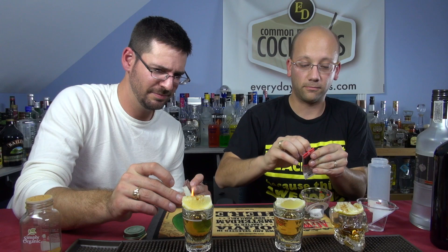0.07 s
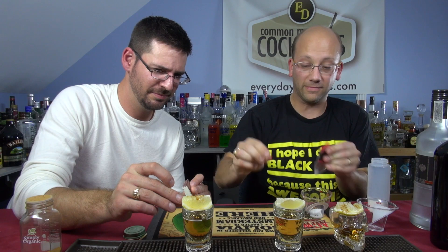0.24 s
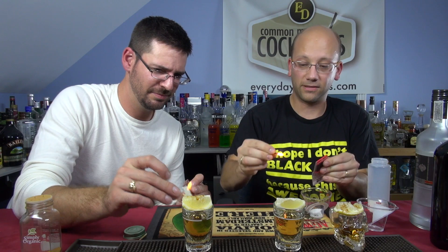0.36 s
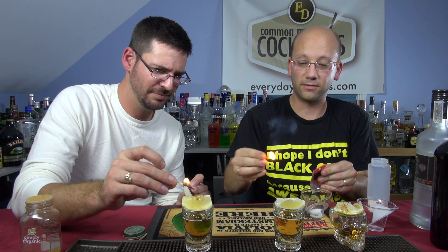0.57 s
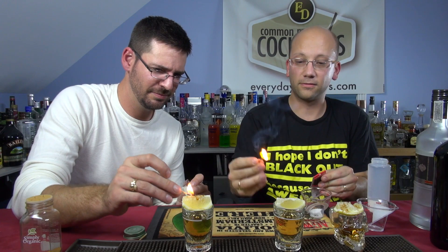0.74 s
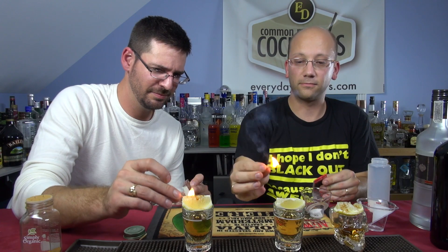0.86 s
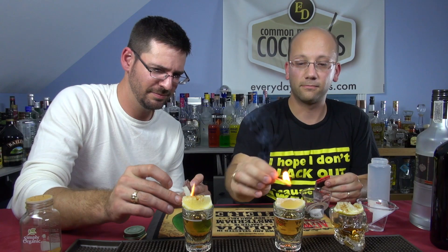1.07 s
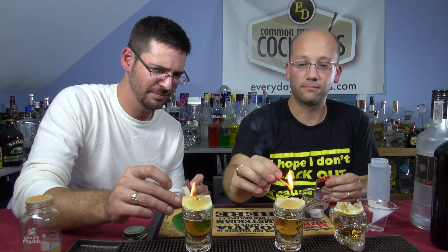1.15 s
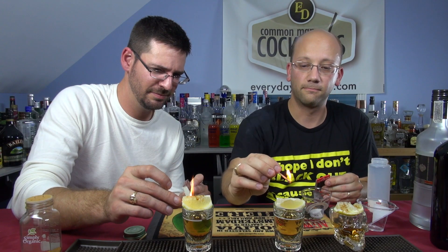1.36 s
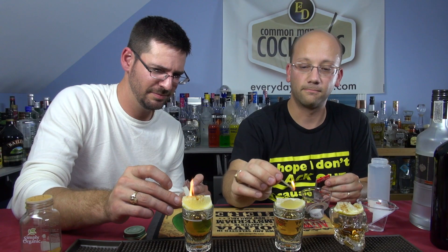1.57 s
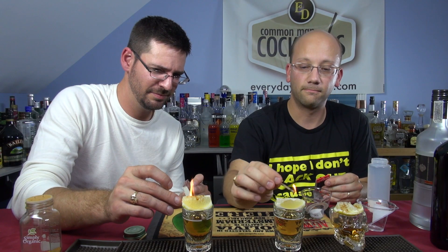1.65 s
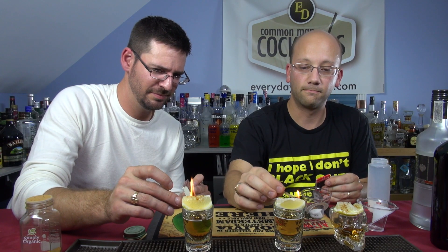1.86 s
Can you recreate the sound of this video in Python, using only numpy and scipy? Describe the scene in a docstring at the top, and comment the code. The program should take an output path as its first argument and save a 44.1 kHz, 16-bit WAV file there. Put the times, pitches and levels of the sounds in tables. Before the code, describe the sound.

Wooden match rasps across a striking strip, fizzes and snaps loudly, a dull bump on the counter follows, then quiet breathy flaring for about a second and sparse tiny ticks; near microphone, short indoor reverberation.

```python
"""A match is struck at a bar counter in a small, quiet room.
The head grates along the box as grit on the strip rings it, and coarse grains add short rasps.
It catches with a rising fizz and a sharp double crack, then flares: a hiss and low rush of noise,
echoed by the counter top, with a soft puff near the end.
A dull bump sets counter modes ringing, and dry ticks go on over air noise and a low hum."""
import sys
import numpy as np
from scipy import signal
from scipy.fft import rfft, irfft, next_fast_len
from scipy.io import wavfile

SR = 44100
rng = np.random.default_rng(int(sys.argv[2]) if len(sys.argv) > 2 else 0)


def unload_audio(sound):
    """Save the sound as a 16-bit wav file, at the path given as the first command line argument."""
    columns = np.transpose(np.atleast_2d(sound))
    # keep every value between -1 and 1, then stretch to whole-number steps
    steps = np.round(np.clip(columns, -1, 1) * 32767)
    wavfile.write(sys.argv[1], SR, steps.astype(np.int16))


N = 83790
TIME = np.arange(N) / SR
CRACK_S = .2559  # the head cracks and the scrape ends

# Spectrum of ticks, crackle and snags: (frequency [Hz], level [dB])
TICK_COLOUR = [(300, -18.5), (1100, -13.5), (1600, -3.5), (2700, -5.5), (3100, 2), (3700, -5),
               (4500, -10.5), (6000, -2.5), (7900, -0.5), (8800, -5.5), (15500, -8), (18000, -17)]


def from_db(db):
    """Decibels to gain."""
    return 10 ** (np.asarray(db) / 20)


def rms_one(x):
    """Scale to unit power."""
    return x / np.sqrt(np.mean(x ** 2) + 1e-20)


def in_time(rows):
    """Each column of a curve, interpolated at every sample."""
    s, *columns = np.transpose(rows)
    return [np.interp(TIME, s, c) for c in columns]


def colour(x, points, tilt_db=0, keep_power=True):
    """Causal minimum-phase filter with the given spectrum, tilted in dB per octave."""
    size = 2 * next_fast_len(len(x))
    octave = np.log2(np.maximum(np.fft.rfftfreq(size, 1 / SR), 1))
    hz, db = np.transpose(points)
    gain = from_db(np.interp(octave, np.log2(hz), db) + tilt_db * octave)
    if keep_power:
        gain = rms_one(gain)
    # Folding the cepstrum forward in time makes the filter causal
    cepstrum = irfft(np.log(gain))
    cepstrum[1:size // 2] *= 2
    cepstrum[size // 2 + 1:] = 0
    response = np.exp(rfft(cepstrum))
    return irfft(rfft(x, size) * response)[:len(x)]


def noise(points):
    """Coloured noise of unit power."""
    return rms_one(colour(rng.standard_normal(N), points))


def drift(rate):
    """Smooth random wavering of spread 1: noise low-passed at rate [Hz]."""
    lowpass = signal.butter(2, rate, fs=SR, output="sos")
    settled = signal.sosfilt(lowpass, rng.standard_normal(2 * N))[N:]
    return rms_one(settled)


def grains(per_s, spread_db):
    """Random clicks of uneven size and either sign, unit power."""
    sizes = from_db(spread_db * np.minimum(rng.exponential(1, N), 4))
    signed = sizes * rng.choice([-1, 1], N)
    return rms_one(signed * (rng.random(N) < per_s / SR))


def burst(decay_s, size=2048):
    """A brief spit of noise that swells and dies, with an even spectrum and unit energy."""
    fade = TIME[:size] / decay_s * np.exp(-TIME[:size] / decay_s)
    x = rng.standard_normal(size) * fade
    # Flatten the spectrum and restore the fade in turn
    for _ in range(6):
        phase = np.angle(rfft(x, 2 * size))
        flat = irfft(np.exp(1j * phase))[:size]
        x = flat * (fade / fade.max()) ** .25
    return x / np.linalg.norm(x)


def at(s, x):
    """Place a short sound at its moment."""
    return np.pad(x, (max(int(s * SR), 0), N))[:N]


def resonate(x, hz, width_hz):
    """Two-pole resonance with gain 1 on top."""
    r = np.exp(-np.pi * width_hz / SR)
    feed = np.array([1, 0, -1]) * (1 - r * r) / 2
    return signal.lfilter(feed, [1, -2 * r * np.cos(2 * np.pi * hz / SR), r * r], x)


def patchy(x, depth_db, count=20):
    """Overlapping parts of the spectrum each waver in level by themselves; unit power."""
    patches_per_s = 9
    place = np.sqrt(2 * np.fft.rfftfreq(N)) * count
    spectrum = rfft(x)
    bands = (irfft(spectrum * np.maximum(0, 1 - abs(place - k)), N) for k in range(count + 1))
    return rms_one(sum(band * from_db(depth_db * drift(patches_per_s)) for band in bands))


def background():
    """Air noise of the room under a low hum that wavers in phase and level."""
    # Spectrum of the air noise: (frequency [Hz], level [dB])
    air_colour = [(25, -6), (58, 0), (160, -5), (320, -15.5), (560, -19.5), (780, -15.5), (1100, -22),
                  (2200, -26.5), (3200, -22.5), (4500, -27.5), (7700, -20.5), (8700, -29), (10100, -20),
                  (11600, -32.5), (15500, -24.5)]
    air_db, hum_db, hum_hz = -53, -57, 58.2
    phase = 2 * np.pi * hum_hz * TIME + 0.6 * drift(5.7)
    hum = np.sqrt(2) * np.sin(phase) * (1 + 0.29 * drift(1.9))
    return from_db(air_db) * noise(air_colour) + from_db(hum_db) * hum


def room(x):
    """One near wall echo and a short diffuse tail of decaying noise."""
    # Colour of the reverberation: (frequency [Hz], level relative to the sound sent in [dB])
    room_colour = [(100, -4.5), (400, -4), (900, -6), (1600, -3), (4000, -11), (7000, -10.5), (10000, -28),
                   (15500, -24)]
    t60_s, gap_s = 0.2, 0.0046
    wall_echo_s, wall_echo_gain = .0082, 0.28
    tail = rng.standard_normal(N) * from_db(-60 * TIME / t60_s) * (TIME > gap_s)
    response = tail / np.linalg.norm(tail) + at(wall_echo_s, np.array([wall_echo_gain]))
    return signal.fftconvolve(x, colour(response, room_colour, keep_power=False))[:N]


def overload_shift():
    """The recorder's level is pushed to one side by the loud crack and drifts back."""
    shift_db, attack_s, decay_s = -29, .002, 0.045
    onset = 1 - np.exp(-TIME / attack_s)
    return at(CRACK_S, -from_db(shift_db) * onset * np.exp(-TIME / decay_s))


def bump():
    """A soft contact sets the counter's low modes ringing."""
    # Modes of the counter: (frequency [Hz], relative level [dB], t60 [s])
    counter_modes = [(172, -15, 0.076), (268, 5, 0.02), (435, -8, 0.063)]
    bump_s, contact_s, bump_db = .3936, 0.0018, -25
    push = np.sin(np.pi * np.minimum(TIME / contact_s, 1)) ** 2
    ring = sum(from_db(db - 60 * TIME / t60) * np.cos(2 * np.pi * hz * TIME)
               for hz, db, t60 in counter_modes)
    softened = signal.fftconvolve(ring, push / push.sum())[:N]
    return at(bump_s, from_db(bump_db) * softened)


def tick(tilt_db, decay_s, ring_hz):
    """A ragged little fracture with a resonance of its own; unit energy."""
    ring_width_hz, ring_db, grain_db = 640, 2.5, 3.5
    x = burst(decay_s)
    ragged = x * from_db(grain_db * rng.standard_normal(len(x)))
    x = colour(ragged, TICK_COLOUR, tilt_db)
    x = x + from_db(ring_db) * resonate(x, ring_hz, ring_width_hz)
    return x / np.linalg.norm(x)


def ticks():
    """Burning wood gives single dry ticks over a faint random crackle."""
    # Ticks of burning wood:
    # (time [s], energy [dB], treble tilt [dB per octave], decay [s], resonance [Hz])
    wood_ticks = [(.399, -16, -2, .0005, 7600), (.405, -18, -1, 0.00024, 6800),
                  (0.4605, -17, 3, 0.00031, 9600), (0.5266, -16, 1, 0.00068, 5440),
                  (.843, -21, 2, 0.00043, 9700), (1.1801, -23, -1.5, .0007, 9500),
                  (1.3393, -18.5, 0, .0001, 7800), (1.341, -16.5, 1, 0.00042, 3030),
                  (1.3672, -24, -1, 0.00058, 9000), (1.3805, -27, 5, 0.00016, 9500),
                  (1.4369, -20, -1, 0.000082, 2930), (1.5837, -20.5, .5, 0.00017, 9100),
                  (1.642, -24.5, -4, 0.00047, 5000), (1.8224, -26.5, 0, .0008, 7100),
                  (1.8405, -27, 1.5, .0009, 9600)]
    crackles_per_s, spread_db, crackle_db = 320, 1.5, -61
    clear = sum(at(s, from_db(db) * tick(tilt, decay, hz)) for s, db, tilt, decay, hz in wood_ticks)
    crackle = colour(grains(crackles_per_s, spread_db), TICK_COLOUR)
    return clear + from_db(crackle_db) * crackle


def snags():
    """The head snags on coarse grains that break off the strip, each with a short rasp."""
    # Snags on coarse grit: (time [s], energy [dB])
    snag_moments = [(0.0184, -13.5), (0.1384, -16.5), (0.1698, -16), (.1786, -15), (0.1956, -21),
                    (0.2032, -18.5), (.215, -19)]
    decay_s, tilt_db = .00055, -1.5  # tilt per octave
    rasps = sum(at(s, from_db(db) * burst(decay_s)) for s, db in snag_moments)
    return colour(rasps, TICK_COLOUR, tilt_db)


def squeak():
    """The head squeaks briefly as it speeds off the end of the strip: noise through resonances."""
    # Squeak resonances: (frequency [Hz], width [Hz])
    squeak_modes = [(5100, 350), (7100, 510)]
    squeak_s, spread_s, squeak_db = 0.235, 0.003, -31
    rub = rng.standard_normal(N)
    tone = rms_one(sum(rms_one(resonate(rub, hz, width)) for hz, width in squeak_modes))
    return from_db(squeak_db) * tone * np.exp(-((TIME - squeak_s) / spread_s) ** 2 / 2)


def scrape():
    """Grit catches on the head and rings the box; a thin whisk of friction sinks along the stroke."""
    # Pressure of the head on the striking strip: (time [s], level [dB])
    stroke = [(0, -43.5), (.011, -38.5), (.022, -37), (.092, -37.5), (.135, -35.5), (.19, -41), (.232, -41),
              (.25, -40)]
    # Spectrum of the scrape: (frequency [Hz], level [dB])
    strip_colour = [(300, -12.5), (1300, -10), (1900, -2), (2400, -4), (4300, -2.5), (6300, -1), (8800, 1),
                    (10200, -13.5), (15500, -18)]
    # Ring of the box: (frequency [Hz], width [Hz], level over the scrape [dB])
    box_modes = [(3160, 290, 6), (3400, 250, 8)]
    grit_per_s, grit_spread_db, rub_db, patchy_db = 1600, 3.5, 0.5, 1.5
    whisk_start_hz, sag_hz_per_s, whisk_width_hz, whisk_db = 15440, 22000, 3400, -9.5

    rough = grains(grit_per_s, grit_spread_db) + from_db(rub_db) * rng.standard_normal(N)
    grit = colour(rough, strip_colour)
    rung = grit + sum(from_db(db) * resonate(grit, hz, width) for hz, width, db in box_modes)

    # Random amplitude spreads the sinking tone into a narrow band
    whisk_hz = np.maximum(whisk_start_hz - sag_hz_per_s * TIME, 0)
    tone = np.sin(2 * np.pi * np.cumsum(whisk_hz) / SR)
    whisk = from_db(whisk_db) * drift(whisk_width_hz / 2) * tone
    pressure = from_db(in_time(stroke)[0]) * (TIME < CRACK_S)
    return (rms_one(patchy(rung, patchy_db)) + whisk) * pressure


def ignition():
    """A swelling fizz with one small pop, then the crack of the head catching, in two quick snaps."""
    # Spectrum of fizz and pop: (frequency [Hz], level [dB])
    fizz_colour = [(120, -22), (280, -13), (900, -24.5), (1600, -3), (2700, -8), (5100, -1), (6500, 1),
                   (9000, -2), (15500, -8)]
    # Spectrum of the crack: (frequency [Hz], level [dB])
    crack_colour = [(200, -19.5), (390, -7.5), (600, -11), (920, 2), (1250, -8.5), (1700, -4.5),
                    (2700, -16), (3200, -13), (3700, -6), (4400, -6.5), (5200, -3.5), (5800, -10.5),
                    (7200, -4.5), (8200, -16), (15500, -21.5)]
    catch_s, rise_db_per_s = 0.2446, 1000
    end_s, fall_db_per_s, fizz_db = 0.25, 552, -22.5
    pop_s, pop_db, pop_decay_s, pop_tilt_db = .2434, -0.5, 0.00051, -2
    snap_decay_s = .00048

    rise_db = (TIME - catch_s) * rise_db_per_s
    fall_db = (end_s - TIME) * fall_db_per_s
    swell_db = np.minimum(0, np.minimum(rise_db, fall_db))
    fizz = from_db(fizz_db + swell_db) * rng.standard_normal(N)
    pop = colour(at(pop_s, from_db(pop_db) * burst(pop_decay_s)), fizz_colour, pop_tilt_db)
    snaps = [(CRACK_S, 12.8), (.2574, 7)]  # (time [s], energy [dB])
    crack = sum(at(s, from_db(db) * burst(snap_decay_s)) for s, db in snaps)
    return colour(fizz, fizz_colour) + pop + colour(crack, crack_colour)


def flare():
    """Gas sputters from the burning head, mirrored by the counter top, dulls and collapses in a puff."""
    # Course of the flare: (time [s], hiss level [dB], low rush level [dB])
    flare_course = [(.255, -72, -81), (.28, -42, -53.5), (.42, -48, -50), (.58, -48, -50.5),
                    (.68, -46, -48), (.77, -49.5, -49), (.87, -45.5, -47), (1.03, -44, -46.5),
                    (1.14, -46.5, -46), (1.16, -55, -52.5), (1.2, -51.5, -57.5), (1.33, -71, -75)]
    # Spectra of hiss, rush and puff: (frequency [Hz], level [dB])
    hiss_colour = [(1200, -26), (2100, -5), (2450, -0.5), (3400, 0.5), (5500, 1), (7000, 1.5), (9000, -2.5),
                   (12000, -8.5), (15500, -11)]
    rush_colour = [(50, -15.5), (110, -3), (450, 0.5), (700, -5), (1200, -4), (1800, -6.5), (2600, -8),
                   (6000, -36)]
    puff_colour = [(50, -11), (110, -7.5), (160, 1.5), (300, -6), (800, -5), (1500, -12.5), (3000, -13),
                   (14000, -37)]
    # Echo off the counter top, shifting as the match moves: (time [s], delay [ms])
    counter_delay = [(.4, 0.69), (.65, 0.69), (.85, 0.82), (1.0, 0.746), (1.14, 0.76)]
    echo_gain, patchy_db = 0.41, 1.5
    sputter_db, sputter_hz = 1.5, 130
    dulling_above_hz, dulling_db_per_s, dulling_mid_s = 8300, 10, 0.5
    puff_s, puff_db, puff_decay_s = 1.139, -12.5, 0.00325

    hiss_db, rush_db = in_time(flare_course)
    hiss = patchy(noise(hiss_colour), patchy_db)
    highpass = signal.butter(2, dulling_above_hz, "high", fs=SR, output="sos")
    treble = signal.sosfiltfilt(highpass, hiss)
    treble_gain = from_db(-dulling_db_per_s * (TIME - dulling_mid_s))
    hiss = hiss + treble * (treble_gain - 1)

    gas = from_db(hiss_db) * hiss + from_db(rush_db) * noise(rush_colour)
    jet = gas * from_db(sputter_db * drift(sputter_hz))
    echo = np.interp(TIME - in_time(counter_delay)[0] / 1000, TIME, jet)
    puff = colour(at(puff_s, from_db(puff_db) * burst(puff_decay_s)), puff_colour)
    return jet + echo_gain * echo + puff


def scene(scrape_room_db=-5, flare_room_db=-4, bump_room_db=-7):
    """Match and bump excite the room; the sum reaches two channels, a little louder on the left."""
    # Resonances of the room: (frequency [Hz], width [Hz], level over the direct sound [dB])
    room_modes = [(155.5, 15, 6.5), (878, 26, -5.5), (996, 40, -5), (1438, 5.5, -22), (1650, 16, -5)]
    left_over_right_db, spread_db = 3, -36
    # (sound, level sent into the room [dB])
    sources = [
        (scrape() + snags() + squeak(), scrape_room_db),
        (ignition(), 0),
        (flare(), flare_room_db),
        (bump(), bump_room_db),
        (ticks(), -2.5),
    ]
    direct = sum(x for x, db in sources)
    send = sum(from_db(db) * x for x, db in sources)
    ring = sum(from_db(db) * resonate(direct, hz, width) for hz, width, db in room_modes)
    mid = direct + ring + room(send) + overload_shift() + background()
    sides = np.array([[1], [-1]])
    # A second, faint reverberation of opposite sign left and right widens the room
    width = sides * from_db(spread_db) * room(send)
    return mid * from_db(sides * left_over_right_db / 2) + width


def record(dry):
    """The microphone channel rounds off loud peaks and cuts the top of the treble."""
    overload, cutoff_hz = 0.86, 15800
    rounded = overload * np.tanh(dry / overload)
    lowpass = signal.ellip(12, .1, 80, cutoff_hz, fs=SR, output="sos")
    return signal.sosfilt(lowpass, rounded)


dry = scene()
out = record(dry)
unload_audio(out)
```